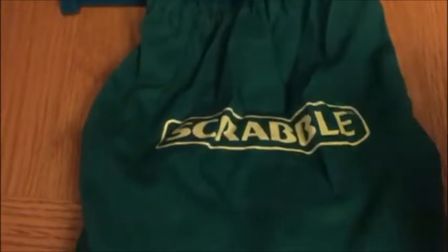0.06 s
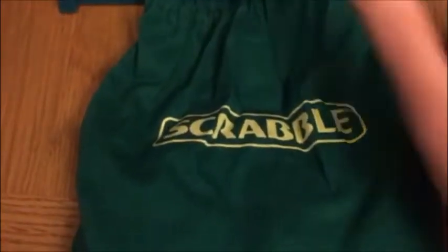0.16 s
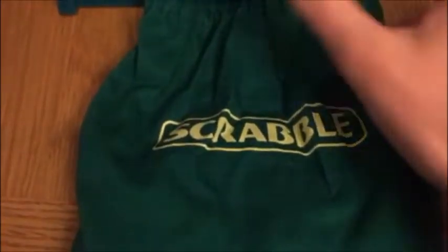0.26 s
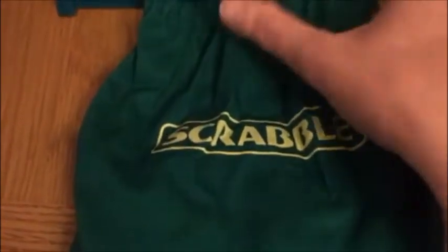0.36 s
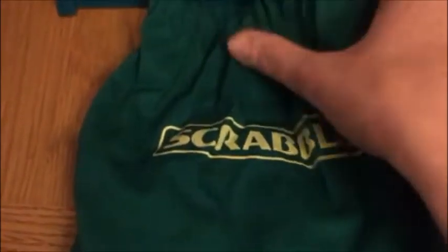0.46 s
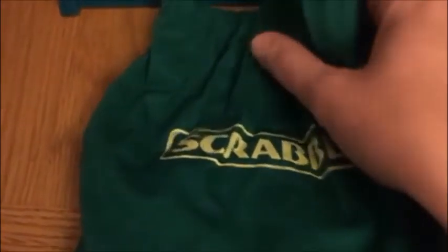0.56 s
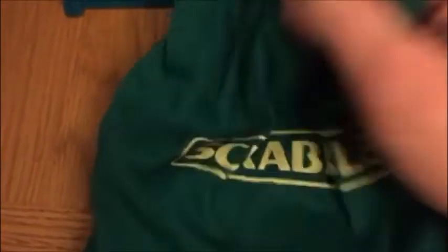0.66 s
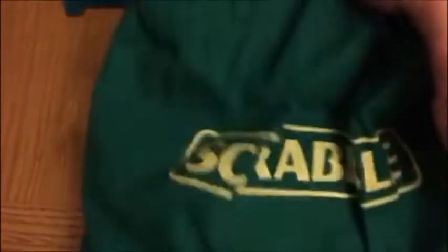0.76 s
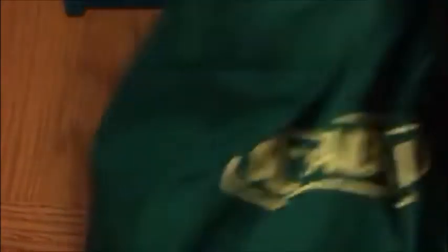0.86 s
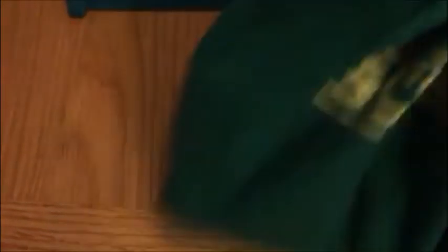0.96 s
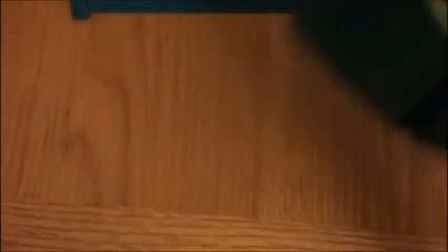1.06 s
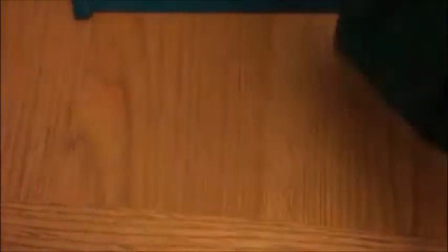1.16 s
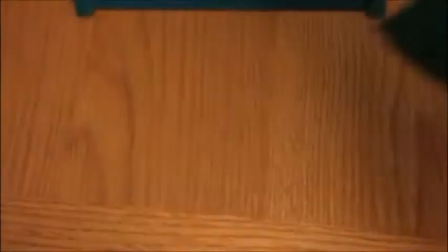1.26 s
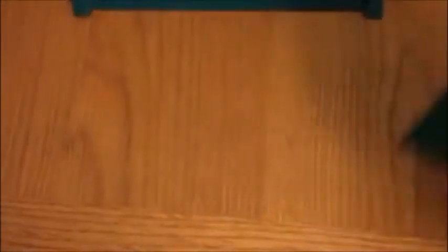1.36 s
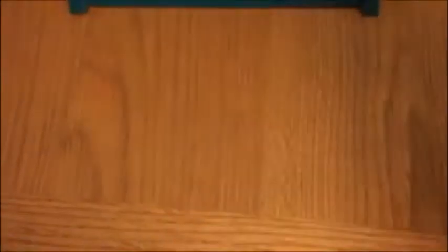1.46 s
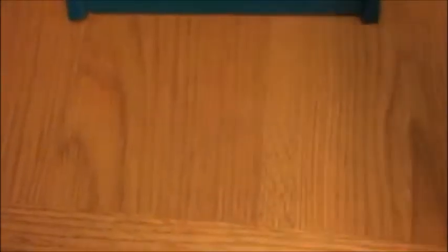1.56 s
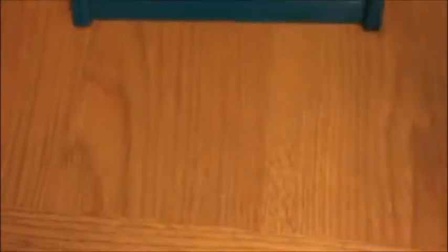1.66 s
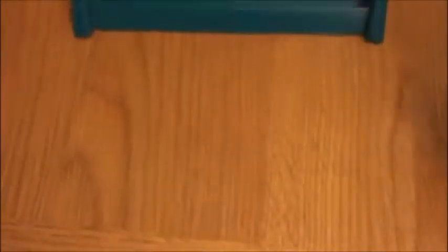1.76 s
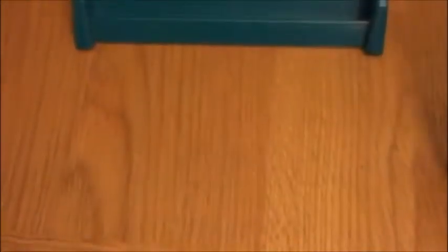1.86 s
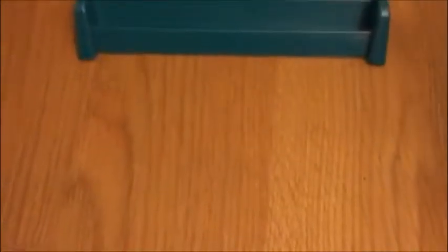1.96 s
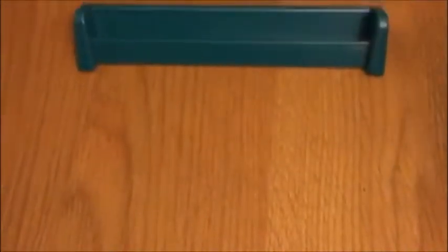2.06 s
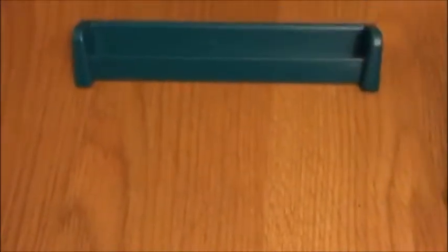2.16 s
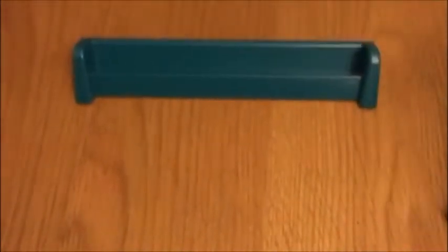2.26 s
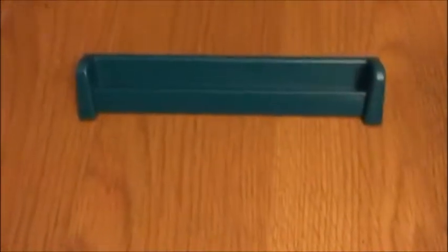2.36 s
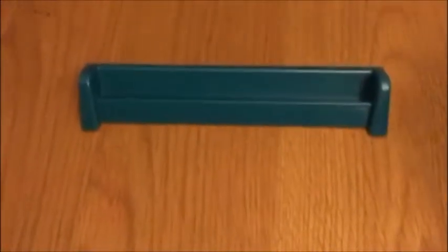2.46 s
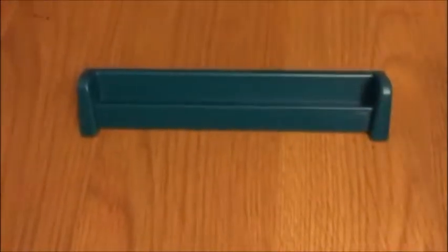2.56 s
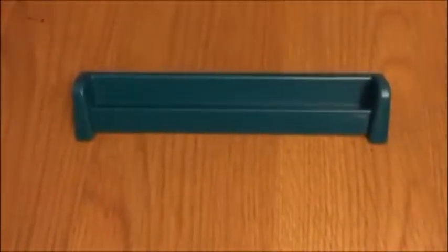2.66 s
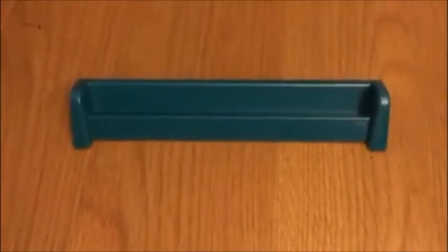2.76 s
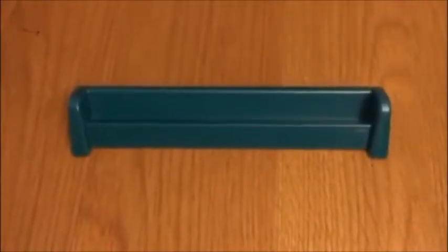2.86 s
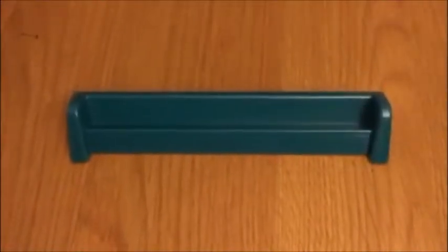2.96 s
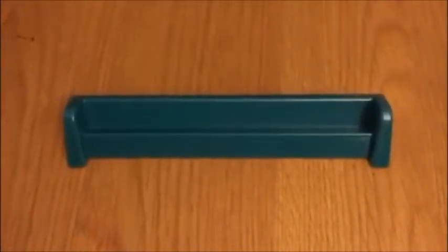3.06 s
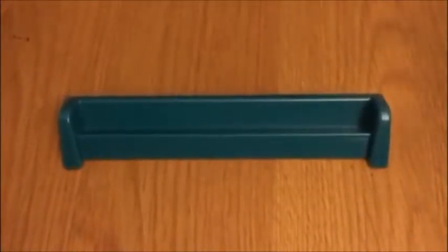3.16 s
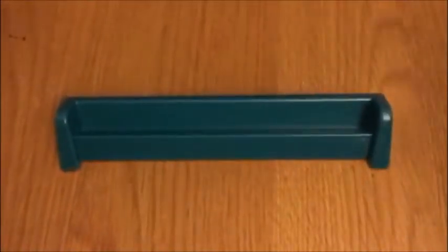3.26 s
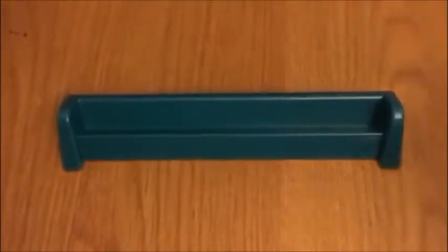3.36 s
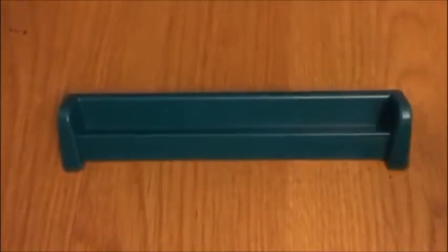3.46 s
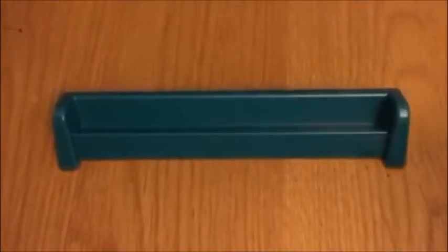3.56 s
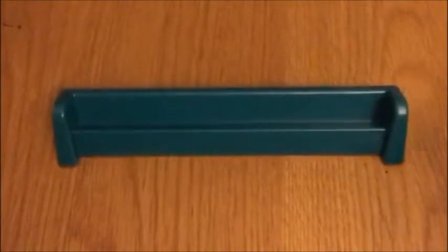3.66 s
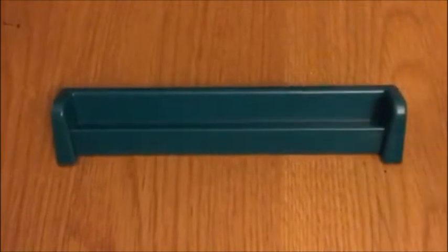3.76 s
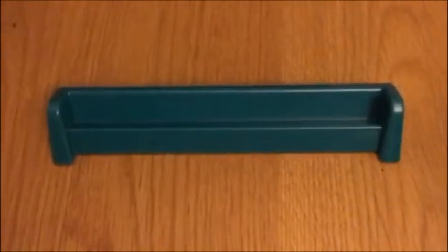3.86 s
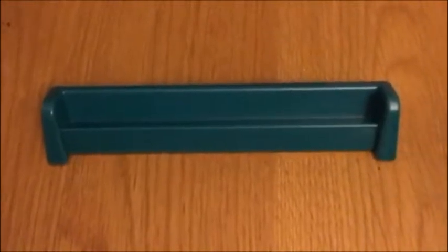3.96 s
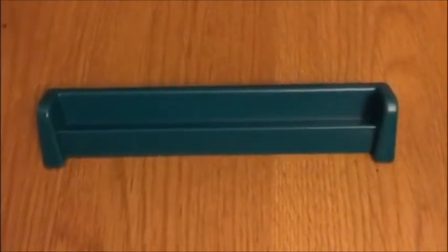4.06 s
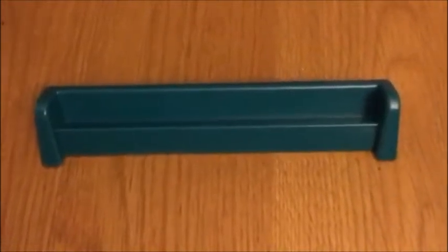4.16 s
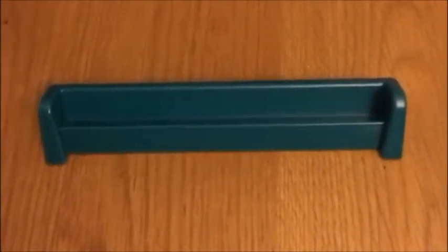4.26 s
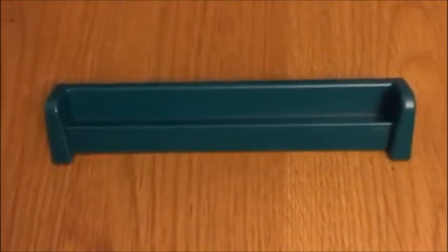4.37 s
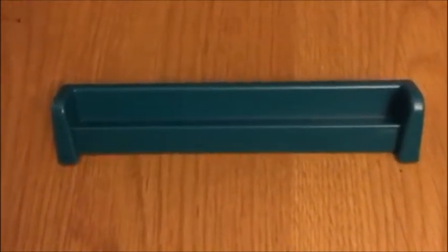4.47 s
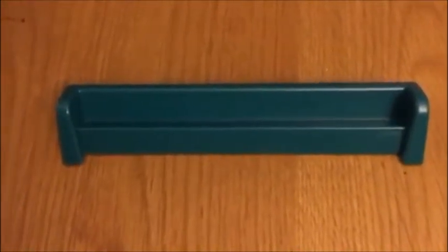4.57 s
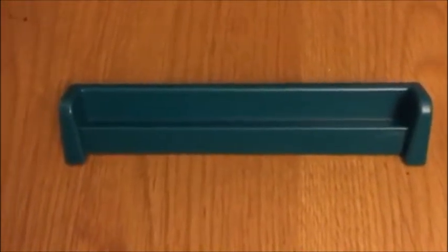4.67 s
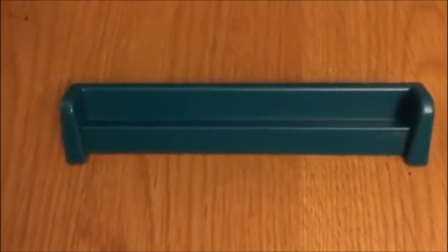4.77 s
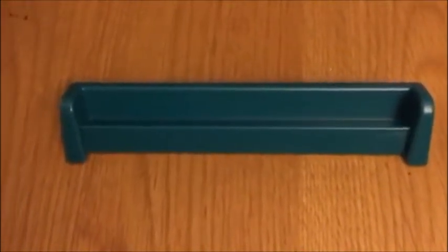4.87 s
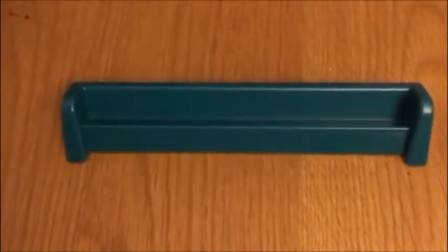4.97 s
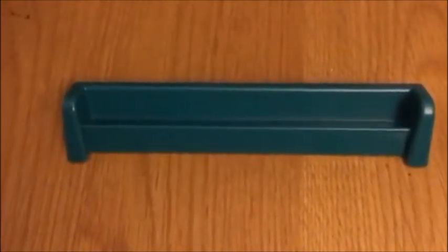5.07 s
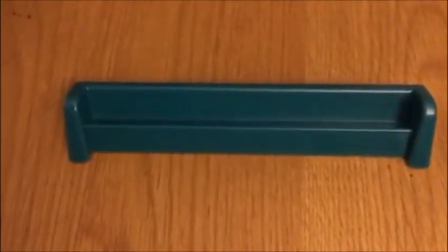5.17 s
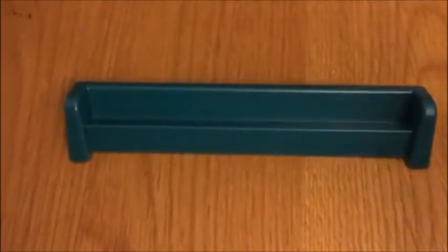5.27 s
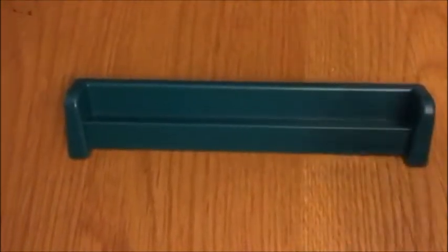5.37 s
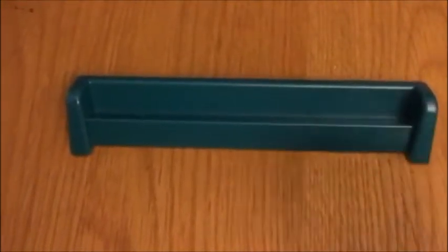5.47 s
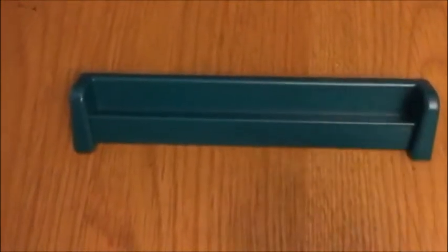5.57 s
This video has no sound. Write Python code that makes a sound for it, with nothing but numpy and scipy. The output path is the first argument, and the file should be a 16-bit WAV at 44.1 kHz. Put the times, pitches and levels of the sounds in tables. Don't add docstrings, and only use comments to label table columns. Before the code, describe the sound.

Small hard tiles clatter inside a cloth bag in two bursts of rapid bright clicking, with soft rustle and table knocks in a quiet room.

```python
import sys
import numpy as np
from scipy import signal
from scipy.io import wavfile
from scipy.ndimage import uniform_filter1d, minimum_filter1d

SR = 44100
rng = np.random.default_rng(int(sys.argv[2]) if len(sys.argv) > 2 else 0)


def pcm_store(signal):
    levels = np.round(np.clip(np.atleast_2d(signal), -1, 1) * 32767)
    wavfile.write(sys.argv[1], SR, levels.astype(np.int16).T)


def rack_gain(trim_db):
    fader = np.asarray(trim_db, float)
    return 10 ** (fader / 20)


N = 247180


def read(points, hz):
    f, value = np.transpose(points)
    return np.interp(np.log(hz + 1), np.log(f + 1), value)


def evened(x, size=None):
    power = np.mean(x ** 2) if size is None else abs(uniform_filter1d(x ** 2, size))
    return x / np.sqrt(power + 1e-20)


def coloured(x, points):
    hz = abs(np.fft.fftfreq(8192, 1 / SR))
    log_gain = np.log(rack_gain(np.maximum(read(points, hz), -100)))
    taps = np.fft.ifft(np.exp(np.conj(signal.hilbert(log_gain)))).real[:4096]
    return signal.oaconvolve(x, taps)[:len(x)]


def noise():
    return rng.standard_normal(N)


def add(mix, s, sound):
    part = mix[round(s * SR):][:len(sound)]
    part += sound[:len(part)]


def ring(hz, t60, rise=0.00022, size=800):
    t = np.arange(size) / SR
    contact = np.sin(np.pi / 2 * np.minimum(t / rise, 1)) ** 2
    return contact * rack_gain(-60 * t / t60) * np.sin(2 * np.pi * hz * t)


def blows(per_s, spread_db):
    clumps = rack_gain(1.4 * evened(uniform_filter1d(noise(), 300)))
    size = rack_gain(spread_db * np.minimum(rng.exponential(1, N), 4)) * rng.choice([-1., 1.], N)
    return size * clumps * (rng.random(N) < per_s / SR)


def swells(rows, rounding):
    s, peak_db, build, die = np.array(rows)[:, :4, None].transpose(1, 0, 2)
    t = np.arange(0, N + 32, 32) / SR - s
    return rack_gain(peak_db - 20 * abs(np.where(t < 0, t / build, t / die)) ** rounding) ** 2


def spread(values):
    return np.interp(np.arange(N) / 32, np.arange(len(values)), values)


# frequency in Hz, level in dB per Hz.
ROOM_TONE = [(20, -43), (45, -4.5), (140, -10), (550, -15), (1150, -10), (1500, -13.5), (2500, -23.5),
             (6000, -30.5), (14400, -33)]
ROOM_TONE_DB = -71.5


def room_tone():
    opening_db = np.interp(np.arange(N) / SR, [0, .3], [-3.0, 0])
    settling_db = opening_db + 1.3 * evened(uniform_filter1d(noise(), 4000))
    return rack_gain(ROOM_TONE_DB + settling_db) * evened(coloured(noise(), ROOM_TONE))


# frequency in Hz, time to fall 60 dB in seconds.
ROOM = [(1500, 0.24), (4000, 0.16), (16000, 0.022)]


def room(x):
    taps = np.zeros(SR // 3)
    at = np.arange(150, len(taps) - 20, 20)
    taps[at + rng.integers(0, 20, len(at))] = rng.choice([-1., 1.], len(at))
    hz, t, z = signal.stft(taps, SR, nperseg=256)
    tail = signal.istft(z * rack_gain(-60 * t / read(ROOM, hz)[:, None]), SR, nperseg=256)[1]
    return signal.fftconvolve(x, tail / np.linalg.norm(tail))[:N]


# start in seconds, peak in dB, pitch in Hz, time to fall 60 dB in seconds.
BUMPS = [
    (.2115, -48.5, 213, 0.11),
    (.234, -50.5, 294, 0.082),
    (0.892, -42.5, 234, 0.08),
    (1.967, -29, 417, 0.025),
    (2.261, -44.5, 152, 0.067),
    (2.674, -39.5, 200, 0.029),
    (2.92, -45, 467, 0.022),
    (3.39, -24, 307, 0.022),
    (5.148, -55.5, 109, 0.6),
]


def bumps():
    out, cracks = np.zeros((2, N))
    crack_fall_db = 60 * np.arange(4000) / SR / 0.099
    for s, peak_db, hz, t60 in BUMPS:
        thud = ring(hz, t60, rise=0.0033, size=12000)
        thud += 0.3 * ring(1.7 * hz, 0.53 * t60, rise=0.0024, size=12000)
        add(out, s, rack_gain(peak_db) * thud)
        if t60 < .2:
            add(cracks, s, rack_gain(peak_db - 10.0 - crack_fall_db))
    crack_colour = [(250, -23.5), (600, -1.5), (1300, 0.0), (3000, -12.0), (8000, -30)]  # (Hz, dB)
    return out + cracks * evened(coloured(noise(), crack_colour))


# middle in seconds, peak in dB, pitch in Hz.
SLUMPS = [(0.717, -55, 80), (0.766, -55, 88), (0.867, -48, 61), (0.903, -51, 83), (1.033, -54, 91),
          (1.257, -51.5, 158), (1.486, -41.5, 80), (1.637, -52, 156), (1.687, -55, 102), (1.729, -51, 142),
          (1.858, -50.5, 126), (2.272, -51.5, 102), (3.233, -52, 67.6), (3.262, -48, 135), (3.4, -54, 80),
          (3.464, -51.5, 96), (3.829, -59, 91), (4.106, -48, 137), (5.13, -57, 150), (5.154, -52.5, 117.7)]
SLUMP_CYCLES, SLUMP_LIFT_DB = 1.8, 1.5


def slumps():
    out = np.zeros(N)
    t = np.arange(-.06, .06, 1 / SR)
    for s, peak_db, hz in SLUMPS:
        push = np.exp(-(2.1 * t * hz / SLUMP_CYCLES) ** 2) * np.sin(2 * np.pi * hz * t)
        add(out, s + t[0], rack_gain(peak_db + SLUMP_LIFT_DB) * push)
    return out


# frequency in Hz, level in dB per Hz.
CLOTH = [(20, -36.5), (40, -8.5), (76, -1.5), (170, -0.5), (340, -3.5), (700, -17.5), (1500, -72)]
# time of the peak in seconds, thump in dB,
# seconds to build 20 dB, seconds to die 20 dB.
HANDLING = [(.214, -64, -0.6, 0.35), (.712, -54, 0.05, 0.15), (.866, -49.5, -0.01, 0.08),
            (1.04, -56.5, 0.44, 0.1), (1.287, -50, 0.16, 0.06), (1.482, -40.5, 0.11, 0.04),
            (1.72, -45, 0.15, 0.13), (1.97, -51.5, 0.08, 0.25), (2.262, -57, 0.03, 0.23),
            (2.624, -59, 0.16, 0.75), (3.273, -52, 0.3, 0.25), (3.398, -46.5, 0.07, 0.17),
            (3.9, -58.5, 1, 0), (4.111, -55, 0.7, 0.27), (4.39, -54, 0.4, 0.1), (4.57, -62, 0.25, 0.3),
            (5.158, -62, 0.04, -0.5)]
HAND_REST_DB = -74.5


def cloth():
    lumps = rack_gain(2.5 * evened(uniform_filter1d(noise(), 900)))
    level = spread(np.sqrt(swells(HANDLING, 0.97).sum(0) + rack_gain(HAND_REST_DB) ** 2))
    return level * evened(coloured(lumps * noise(), CLOTH), size=6000)


# frequency in Hz, level in dB per Hz.
SLIDE = [(300, -30.5), (1000, -3), (2500, 2.5), (6000, -8.5), (12000, -11), (16000, -12.5)]
SLIDE_S, SLIDE_DB, SLIDE_FOLLOW = 0.025, -40, 0.57
# time in seconds, hiss in dB.
GRIP = [
    (0, -80.5),
    (.44, -90),
    (.5, -71.5),
    (.7, -64),
    (1.1, -71),
    (4.9, -79),
    (5.25, -83),
    (5.6, -93),
]


def slide():
    slow_db = uniform_filter1d(jostling()[0], int(SLIDE_S * SR))
    grip_db = np.interp(np.arange(N) / SR, *np.transpose(GRIP))
    level = np.hypot(rack_gain(SLIDE_DB + SLIDE_FOLLOW * slow_db), rack_gain(grip_db))
    return level * evened(coloured(noise(), SLIDE))


# time of the peak in seconds, clatter in dB,
# seconds to build 20 dB, seconds to die 20 dB, edge brightness in dB.
JOLTS = [(.708, -51, 0.0252, 0.7, -15), (.745, -41.5, 0.0128, 0.27, -11.5),
         (.79, -39.5, 0.0269, 0.11, -12.5), (.92, -49.5, 0.04, 0.2, -20.5),
         (.992, -34, 0.0137, 0.03, -6.5), (1.045, -40, 0.0353, 0.05, -10.5),
         (1.22, -46.5, 0.1049, -0.1, -16), (1.248, -33.5, 0.02, 0.0843, -8.5),
         (1.269, -26.5, 0.02, 0.0058, -7.5), (1.425, -29, 0.0527, 0.0759, -7),
         (1.463, -21.5, 0, -0.0028, -6.5), (1.483, -18.5, 0.0169, 0.0332, -4),
         (1.53, -45, 0.14, 0.2, -8), (1.623, -26, 0.0177, 0.0867, -6),
         (1.694, -23.5, 0.0381, 0.07, -5), (1.745, -31, 0.0352, 0.0348, -5.5),
         (1.875, -33.5, 0.1166, 0.0533, -8.5), (1.97, -38.5, -0.01, 0.1348, -12),
         (2.208, -52, -0.05, 0.3, -22), (2.29, -56.5, 0.04, -0.03, -16), (2.39, -57, 0.1, 0, -15),
         (2.634, -49.5, 0.1, 0.3, -23), (2.74, -53, 0.26, 0.34, -17.5),
         (3.225, -45, 0.15, 0.54, -31), (3.257, -33.5, 0.08, 0.12, -10.5),
                (3.299, -37.5, 0.0845, 0.06, -8), (3.37, -46, 0.05, 0.2, -15.5),
                (3.397, -25, 0.0245, 0.0741, -9), (3.412, -28.5, 0.02, 0.02, -15),
                (3.432, -31, 0.0129, 0, -1.5), (3.476, -36, 0.0247, -0.0938, -6),
                (3.52, -48.5, 0.05, 0.14, -11), (3.612, -47.5, 0.28, 0, -20.5),
                (3.746, -52.5, 0.1, 0.42, -19), (3.805, -48.5, 0.2, 0.32, -23),
                (3.882, -46, 0.01, 0.27, -23), (3.957, -49.5, 0.12, 0.07, -25),
                (4.041, -43.5, 0.06, 0.1, -17.5), (4.095, -39.5, 0.05, 0.09, -10),
                (4.175, -42, 0.1, 0.11, -18), (4.252, -41, 0.04, 0.07, -17), (4.321, -40, 0.004, 0.11, -15),
                (4.39, -42, 0.01, 0.055, -16.5), (4.527, -50, -0.17, 0.1, -24),
                (4.575, -45, 0.03, 0.14, -12), (4.806, -50, 0.004, 0.0962, -10.5)]
STILL_DB, STILL_BRIGHT_DB = -100, -12
ROUND = 1.3


def jostling():
    rows = JOLTS
    power, still = swells(rows, ROUND), rack_gain(STILL_DB) ** 2
    total = power.sum(0) + still
    bright_db = (np.array(rows)[:, 4] @ power + still * STILL_BRIGHT_DB) / total
    return spread(10 * np.log10(total)), spread(bright_db)


# start in seconds, peak
# in dB, knock pitch in Hz, free ring in dB above the peak.
CLICKS = [(.7408, -29.5, 4970, -23), (.7827, -28, 6000, -23), (.9275, -37, 3130, -19),
          (.9483, -24, 5300, -27), (.9571, -26, 5700, -38), (.9825, -25, 5350, -26),
          (1.0206, -23.5, 4260, -39), (1.0328, -23, 4660, -17), (1.042, -24.5, 5760, -28.5),
          (1.088, -38.5, 4350, -38), (1.2606, -20, 4380, -17), (1.37, -37, 3620, -11),
          (1.4068, -24, 4240, -8), (1.4205, -17.5, 5740, -13), (1.4615, -12, 4300, -16),
          (1.6012, -32.5, 3040, -31.5), (1.6381, -10.5, 5370, -17), (1.8729, -23.5, 4500, -12),
          (1.8783, -30.5, 4800, -8), (1.9423, -30.5, 4830, -30), (1.9683, -26, 3220, -8.5),
          (2.2042, -30, 3307, -29), (2.3833, -33.5, 3650, -38.5), (2.4243, -31, 4360, -28),
          (2.6051, -33.5, 3950, -35), (2.6225, -33.5, 4140, -41), (2.6691, -33.5, 3700, -25),
          (2.7133, -35.5, 4740, -20), (.7462, -28.5, 5470, -31), (.9165, -37, 2230, -18),
          (1.478, -13, 5280, -16), (1.4822, -9.5, 5370, -16), (1.6225, -20, 6000, -37),
          (1.628, -22, 5600, -29), (1.7048, -18.5, 4340, -27), (1.7215, -21, 4000, -20),
          (2.8568, -36.5, 4570, -32.5), (2.8616, -34, 4070, -29),
          (3.1453, -38, 3970, -41), (3.2607, -24, 4800, -22), (3.338, -32.5, 3050, -25),
                 (3.3718, -29, 5100, -13.5), (3.3928, -15.5, 5860, -25.5), (3.3997, -17, 5200, -17),
                 (3.495, -31.5, 3860, -15), (3.5189, -30, 3750, -29.5), (3.7544, -37, 3400, -45),
                 (3.7743, -31, 3330, -36), (3.7988, -28, 5370, -34), (3.813, -30, 2380, -42),
                 (3.8372, -31.5, 2780, -41.5), (3.878, -30, 2630, -46), (3.921, -32, 4300, -51),
                 (3.9555, -27, 4000, -29), (4.0423, -23, 4500, -27), (4.085, -33.5, 3970, -20),
                 (4.196, -31, 2320, -21), (4.2486, -26.5, 2720, -10), (4.319, -24, 3540, -24),
                 (4.3244, -23, 4330, -42), (4.339, -25, 3820, -22), (4.3523, -25, 5320, -22),
                 (4.3647, -24.5, 4070, -23), (4.524, -33, 4460, -26), (4.541, -30, 4220, -45),
                 (4.5759, -28.5, 4200, -25), (4.5949, -27.5, 4520, -19.5), (4.6343, -29.5, 5430, -41),
                 (4.8041, -37, 3500, -8)]
RATTLE = [(0.7058, -49, 3450, -13), (0.7275, -52, 4580, -30), (0.7945, -36.5, 3980, -37),
          (0.8044, -49, 3200, -18.5), (0.8211, -41, 2100, -40), (0.8635, -44.5, 2170, -26),
          (0.8745, -51, 2440, -37), (0.9962, -39, 2600, -22), (0.9613, -37.5, 4510, -23),
          (0.9675, -38, 3220, -21), (0.9711, -34, 3780, -27), (0.9879, -30.5, 4440, -27),
          (0.9931, -33.5, 3280, -10), (1.027, -38, 4720, -14), (1.0522, -42, 4450, -29),
          (1.0558, -38, 3400, -18), (1.0731, -45.5, 3560, -19), (1.139, -52.5, 3590, -37),
          (1.9692, -31, 3300, -11), (1.2123, -40.5, 3250, -26), (1.2367, -41.0, 2870, -41),
          (1.2399, -36.0, 3710, -34), (1.2714, -26.5, 3170, -24.5), (1.396, -42.0, 3830, -35),
          (1.4, -37.0, 4040, -36), (1.4151, -29.0, 4890, -16), (1.5297, -33.5, 4490, -18),
          (1.6095, -35, 4980, -19), (1.7836, -47, 3830, -25), (1.8053, -47, 3940, -32.5),
          (1.8218, -39.5, 3320, -34.5), (1.8455, -31.5, 3570, -36), (1.8599, -31.5, 5540, -19),
          (1.8868, -32.5, 5240, -14), (2.0016, -42.5, 2700, -30.5), (2.0363, -41, 2630, -40.5),
          (2.2318, -47, 3320, -33), (4.5838, -41, 4150, -25), (2.63, -42, 3900, -35),
                 (4.617, -40, 5000, -19), (4.6245, -46.5, 4500, -13), (2.6915, -46, 3980, -32),
                 (2.7173, -43.5, 3600, -26), (2.7423, -46, 2920, -28), (4.6735, -51, 4850, -40),
                 (4.2523, -35.5, 5800, -30), (3.177, -47, 4620, -25.5), (3.203, -46.0, 2650, -26),
                 (3.2133, -40, 3800, -25), (3.252, -30, 3940, -34), (3.2803, -27.5, 4070, -22),
                 (3.293, -32, 3900, -30), (3.308, -35.5, 5470, -32.5), (3.8875, -41, 2480, -40),
                 (3.386, -34.5, 3870, -19), (3.4117, -23.5, 3120, -11), (3.469, -32.5, 4770, -16),
                 (3.5448, -42.5, 3310, -32.5), (3.6231, -44.5, 3200, -45), (3.8413, -47, 2800, -40),
                 (4.3428, -34, 4200, -32), (3.882, -39, 2270, -43), (3.9425, -51, 3480, -40),
                 (3.935, -41, 3560, -49), (3.9803, -45.5, 3430, -37), (4.0317, -41, 3640, -33),
                 (4.0385, -37.5, 2450, -43), (4.0942, -34.5, 4200, -25), (4.103, -39.5, 3700, -26),
                 (4.1093, -39, 4360, -29), (4.1348, -40.5, 3560, -39), (4.1842, -34.5, 2630, -40),
                 (4.2077, -44, 2330, -33), (4.314, -56, 2560, -39), (4.3773, -36.5, 4100, -22),
                 (4.401, -41, 3890, -32.5)]
RATTLE_LIFT_DB = 5.5
# start in seconds, peak in dB.
TAPS = [(.574, -52.5), (0.768, -31.5), (.8537, -56), (1.2028, -37), (1.226, -29.5), (1.3904, -41),
        (1.5366, -43), (2.2637, -43.5), (2.2953, -41), (2.3767, -42), (2.473, -49.5), (2.5843, -43),
        (2.7327, -38), (2.8045, -38), (2.978, -45.5), (3.1666, -41), (3.5075, -36.5), (3.534, -38.5),
        (3.6113, -38), (3.6585, -41), (3.742, -36.5), (3.9076, -41), (4.0214, -32), (4.4132, -41),
        (4.5644, -28.5), (4.519, -49), (4.666, -37.5), (4.7254, -47), (4.8776, -40.5), (5.018, -57.5)]
TAP_HZ, TAP_RING_DB = 3620, -32.5


def collisions():
    taps = [(s, peak_db, TAP_HZ, TAP_RING_DB) for s, peak_db in TAPS]
    rattle = [(s, peak_db + RATTLE_LIFT_DB, hz, ring_db)
              for s, peak_db, hz, ring_db in RATTLE]
    return [*CLICKS, *taps, *rattle]


# pitch in Hz, time to fall 60 dB in seconds, spread between tiles as a share.
RINGS = [
    (7068, 0.022, 0.017),
    (12170, 0.013, 0.02),
]
# frequency in Hz, level in dB.
KNOCK = [(300, -44.5), (700, -15.5), (1100, -12), (1900, -6.5), (3000, -3), (5500, -1), (6500, 4.5),
         (8000, -15.5), (12000, -76.5)]
PACKED = [(300, -36), (600, -15.5), (1000, 1), (1500, -5.5), (2200, -2), (4000, -6.5), (6000, -11),
          (8000, -27), (12000, -69)]
EDGE = [(5000, -32.5), (7000, -8.5), (9000, -4), (10500, -12.5), (13500, -12.5), (16000, -15.5)]
RING_DB, RING_PER_BRIGHT = -1.5, 0.65
HEAP_OCTAVES = 0.73


def tile_ring(mode, own, size=800):
    hz, t60, share = RINGS[mode]
    return ring(hz * (1 + share * own), t60, size=size)


def clatter(count=12):
    level_db, bright_db = jostling()
    crowd = np.clip(rack_gain(.5 * (level_db + 40)), .2, 2.5)
    faces, edges = blows(3000 * crowd, 3.6), blows(1800 * crowd, 4.6)
    tile, own = rng.integers(0, count, N), rng.uniform(-1, 1, (count, 2))
    knock, low, high = np.zeros((3, N))
    s, _, pitch_hz, _ = np.transpose(sorted(collisions()))
    heap_hz = np.interp(np.arange(N) / SR, s, pitch_hz)
    for k in range(count):
        hz = 1700 * 3.8 ** (k / count)
        near = np.exp(-(np.log2(hz / heap_hz) / HEAP_OCTAVES) ** 2)
        struck = edges * (tile == k)
        knock += signal.oaconvolve(near * faces * (tile == k), ring(hz, .007, size=400))[:N]
        low += signal.oaconvolve(struck, tile_ring(0, own[k, 0], size=1200))[:N]
        high += signal.oaconvolve(struck, tile_ring(1, own[k, 1]))[:N]

    knock = evened(faces) + 0.96 * evened(knock)
    loose = np.clip((bright_db + 16.5) / 12, 0, 1)
    free_knock, packed_knock = evened(coloured(knock, KNOCK)), evened(coloured(knock, PACKED))
    knock = evened(loose * free_knock + (1 - loose) * packed_knock, size=2500)

    cloth_hiss = noise()
    ticks = coloured(evened(edges) + .5 * evened(faces) + 0.22 * cloth_hiss, EDGE)
    bright = evened(evened(high) + evened(ticks), size=2500)
    low = rack_gain(RING_DB + RING_PER_BRIGHT * bright_db) * evened(low, size=6000)
    quiet_drop_db = 3.8 * np.clip((-32 - level_db) / 8, 0, 1)
    return rack_gain(level_db - 2.5 - quiet_drop_db) * (knock + low + rack_gain(bright_db - 1.0) * bright)


def showers():
    jolts, bright = np.zeros((2, N))
    fall_db = 60 * np.arange(2000) / SR / 0.028
    for s, peak_db, _, ring_db in collisions():
        dying = rack_gain(peak_db - 15.5 - fall_db)
        add(jolts, s + 0.0013, dying)
        add(bright, s + 0.00057, rack_gain(0.48 * ring_db + 15.0) * dying)
    grains = evened(blows(4500, 2.4))
    knocks = 1.1 * coloured(jolts * grains, KNOCK) + .9 * coloured(jolts * grains, PACKED)
    return knocks + coloured(bright * grains, EDGE)


LOW_RING_DB, LOW_RING_SPREAD_DB = 6, 3.5
LOW_RING_DB_PER_OCTAVE = 10.5
CHATTER_DB, CHATTER_T60 = -27, .03
# start in seconds, peak in dB, pitch in Hz, time to fall 60 dB in seconds.
FREE_TILES = [
    (3.402, -19, 12380, 0.043),
    (4.807, -47.5, 7000, 0.16),
    (4.815, -45.5, 6930, 0.15),
]


def clicks():
    out, ticks = np.zeros(N), np.zeros(N)
    chance = rng.uniform(-1.3, 1, (len(collisions()), 8))
    grains = evened(blows(1500, 3))
    chatter_db = CHATTER_DB - 60 * np.arange(1500) / SR / CHATTER_T60
    for (s, peak_db, hz, high_db), c in zip(collisions(), chance):
        knock = ring(hz, 0.005) + 1.1 * ring(hz * (1.4 + 0.16 * c[0]), 0.0028)
        knock += .6 * ring(hz * (.65 + 0.21 * c[4]), 0.0046)
        knock += 0.22 * ring(hz * (1.3 + 0.75 * c[6]), 0.006)
        low_db = high_db + LOW_RING_DB + LOW_RING_SPREAD_DB * c[7]
        low_db += LOW_RING_DB_PER_OCTAVE * np.log2(hz / 4600)
        low = rack_gain(low_db) * tile_ring(0, c[1])
        high = rack_gain(high_db + 9.0) * tile_ring(1, c[2])
        add(out, s - .0002, rack_gain(peak_db + 3.5) * (knock + low + high))
        chatter = grains[round(s * SR):][:1500] * rack_gain(chatter_db)
        add(out, s + .001, rack_gain(peak_db) * signal.fftconvolve(chatter, knock[:400]))
        add(out, s + 0.0053 + 0.0017 * c[3], rack_gain(peak_db - 15.0 + 1.9 * c[5]) * knock)
        ticks[round(s * SR)] = rack_gain(peak_db + high_db + 20.0)
    for s, peak_db, hz, t60 in FREE_TILES:
        add(out, s, rack_gain(peak_db) * ring(hz, t60, rise=0.0021, size=9000))
    return out + coloured(ticks, EDGE)


def scene():
    near = clatter() + clicks() + showers()
    bag = near + rack_gain(-14.0) * room(near) + rack_gain(-2.5) * cloth()
    return (bag + bumps() + slumps() + room_tone() + slide())[None]


FRAME_S = 1024 / 48000
STARVED = {2: 14, 70: 6, 77: 7, 82: 8, 89: 6, 98: 7, 102: 9, 136: 40, 138: 60, 157: 8, 160: 6, 168: 8, 172:
           8, 176: 8, 195: 8, 213: 260, 255: 14}
SHARP_START = [160]
SHARP_END = [102, 213]
SURVIVORS = {70: [1868, 5324, 5474, 5695, 6411, 7068, 12209], 77: [3310, 4618, 4769, 6040, 6481, 6599, 7219,
             12160, 12273], 82: [200, 2234, 2600, 2740, 3273, 3978, 4231, 5377, 6072, 6314, 11983], 89:
             [3811, 4225, 4527, 4721, 5738, 7052], 98: [1722, 2191, 2444, 2723, 3256, 3439, 4048, 4888],
             102: [344, 1259, 1878, 3197, 3482], 157: [1518, 2637, 3644, 4586, 5394, 6928], 160: [2858,
             4231, 5071, 6998, 11918, 12090, 12306], 176: [2142, 2653, 3310, 3639, 4618, 5469, 5754, 7200],
             195: [1044, 2121, 2777, 3784, 4349, 5474, 5684, 7229]}
COARSE_UNDER, COARSE_LIFT_DB = 9, -1.5
COARSE_APART = 27


def starve(x):
    out, half = x.copy(), round(FRAME_S * SR)
    n = np.arange(2 * half) + .5
    basis = np.cos(np.pi / half * np.outer(n[:half], n + half / 2)) * np.sqrt(2 / half)
    slow = np.sin(np.pi / 2 * n[:half] / half)
    sharp = np.sin(np.pi / 2 * np.clip((n[:half] / half - 7 / 16) * 8, 0, 1))
    for frame, count in STARVED.items():
        rise = sharp if frame in SHARP_START else slow
        fall = (sharp if frame in SHARP_END else slow)[::-1]
        window = np.r_[rise, fall]
        start = round((frame - .79) * FRAME_S * SR)
        lines = basis @ (window * x[start:start + 2 * half])
        size, total = abs(lines), np.linalg.norm(lines)
        if frame in SURVIVORS:
            at = np.array(SURVIVORS[frame]) * 2 * half // SR
            kept = np.zeros(half)
            kept[at] = rack_gain(-4.5) * total / np.sqrt(len(at)) * np.sign(lines[at])
        elif count < COARSE_UNDER:
            highest_nearby = -minimum_filter1d(-size, size=COARSE_APART)
            tops = size * (size == highest_nearby)
            step = rack_gain(COARSE_LIFT_DB) * total / np.sqrt(count)
            kept = step * np.sign(lines) * (tops >= np.sort(tops)[-count])
        else:
            kept = lines * (size >= np.sort(size)[-count])
        out[start:start + 2 * half] += window * ((kept - lines) @ basis)
    return out


EMPTY_S = (4.7935, 4.8012)


def empty(x):
    out = x.copy()
    bass = signal.oaconvolve(x, signal.firwin(401, 1300, fs=SR), "same")
    first, last = (round(s * SR) for s in EMPTY_S)
    out[first:last] += signal.windows.tukey(last - first, .5) * (bass - x)[first:last]
    return out


def top_cut(x):
    return signal.sosfilt(signal.butter(12, 16680, fs=SR, output="sos"), x)


def record(dry):
    limited = signal.oaconvolve(dry[0], signal.firwin(401, 15750, fs=SR), "same")
    mix = empty(starve(limited))[None]
    return top_cut(mix)


dry = scene()
out = record(dry)
pcm_store(out)
```